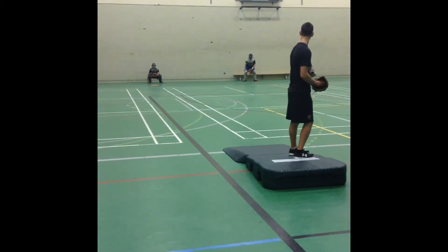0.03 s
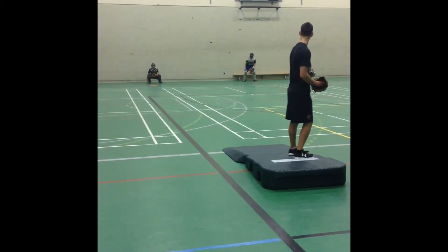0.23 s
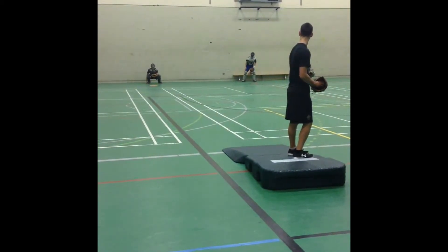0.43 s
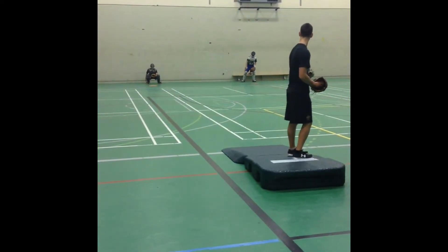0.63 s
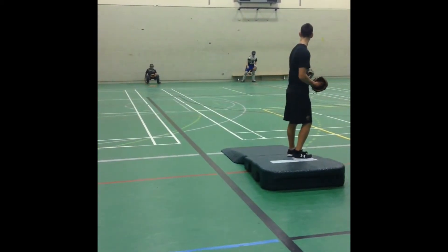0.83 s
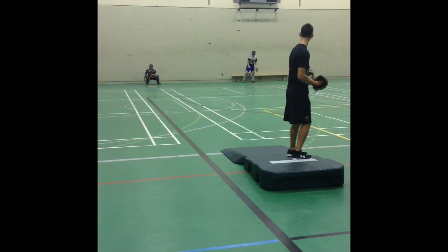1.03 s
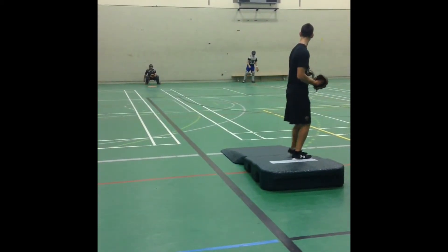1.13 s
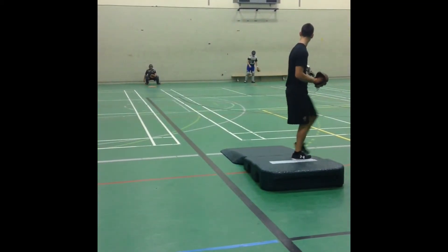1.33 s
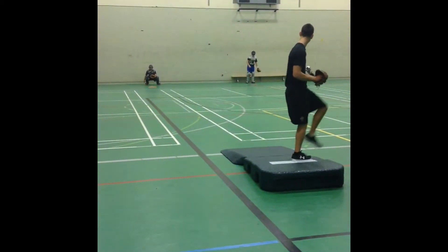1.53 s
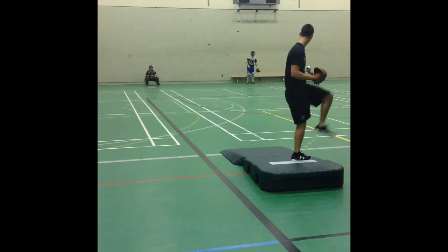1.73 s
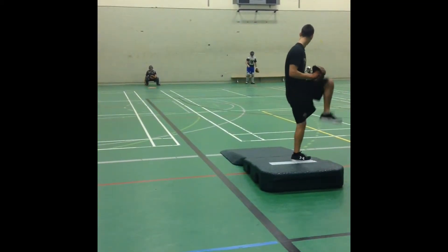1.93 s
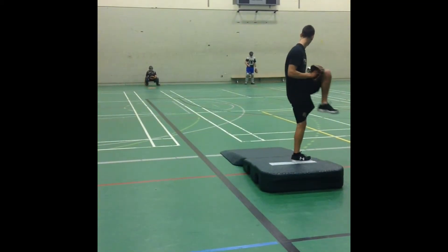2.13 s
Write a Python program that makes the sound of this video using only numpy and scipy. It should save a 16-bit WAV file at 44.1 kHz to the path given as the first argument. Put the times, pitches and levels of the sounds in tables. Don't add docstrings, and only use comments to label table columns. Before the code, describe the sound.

Sharp loud leather pop of a caught ball, then long reverberant ringing in a large hall.

```python
import sys
import numpy as np
from scipy import signal
from scipy.io import wavfile
from scipy.ndimage import uniform_filter1d

SR = 44100
rng = np.random.default_rng(int(sys.argv[2]) if len(sys.argv) > 2 else 0)


def natural_amplitude(level_db):
    exponent = np.asarray(level_db, float) / 20
    return 10 ** exponent


def int16_out(signal):
    q = np.round(np.clip(np.atleast_2d(signal).T, -1, 1) * 32767)
    wavfile.write(sys.argv[1], SR, q.astype(np.int16))


N = 97020

# (frequency [Hz], level [dB], t60 [s])
POCKET_MODES = [(205, -13, .05), (375, -4.5, 0.069), (559, -17.5, .04), (702, -15, 0.031),
                (790, -16, 0.012), (900, -17.5, 0.022), (1452, -13.5, .025), (1760, -17, 0.035),
                (2485, -24.5, .04), (3330, -20.5, 0.025), (3980, -24, 0.022)]
# (frequency [Hz], level [dB], t60 [s])
CLOSING_MODES = [(100.7, -6.5, 0.062), (338, -10.5, 0.028), (1169, -15.5, .08), (2880, -20, 0.065),
                 (3040, -20.5, .04), (4200, -27, 0.015)]
# (frequency [Hz], level [dB], t60 [s])
FLOOR_MODES = [(141.7, -23.5, .25), (88, -31, .3)]
# (frequency [Hz], density [dB per Hz])
CRACK_COLOUR = [(200, -15.5), (500, -8.5), (1000, 4.5), (2100, -15), (3100, -9.5), (5000, -14.5),
                (7600, -21)]
# (delay [s], level [dB])
WALL_ECHOES = [(.038, -16.5), (0.056, -30), (0.0681, -10.5), (.126, -16.5), (0.216, -30)]
# (frequency [Hz], density [dB per Hz])
TAIL_COLOUR = [(40, -29), (150, 2.5), (350, -0.5), (700, -6), (1100, -7.5), (2000, -12.5), (3500, -13.5),
               (7600, -22)]
# (frequency [Hz], width [Hz], gain [dB])
TAIL_PEAKS = [(356, 58, 6), (826, 120, 1), (1190, 83, 9.5), (2600, 400, 0.5)]
# (frequency [Hz], t60 [s])
TAIL_DECAY = [(150, 7), (400, 7.67), (1100, 6.2), (1900, 3.74), (2600, 2), (3300, 1.21), (5000, 0.81),
              (7500, 0.63)]
# (frequency [Hz], build-up [s])
TAIL_BUILD_UP = [(80, 0.081), (300, .03), (2000, 0.015), (7000, .02)]
# (frequency [Hz], width [Hz], level [dB])
BOOM_PEAKS = [(67, 14, -1.5), (88.4, 30, 1.5), (139.6, 30, -4.5)]
# (time [s], peak level [dB], low edge [Hz], high edge [Hz], t60 [s])
SHOE_TICKS = [(.0448, -45.5, 900, 1890, 0.017), (.0452, -61, 2000, 6500, 0.016),
              (.058, -64.5, 1800, 6000, .02), (.1115, -58, 1500, 2490, .015),
              (0.1108, -67, 2600, 6500, 0.0075), (0.156, -69, 3960, 7330, 0.0091),
              (1.204, -55.5, 2800, 4040, 0.022), (1.207, -69, 4520, 7400, .015),
              (1.217, -54.5, 2600, 3570, 0.029), (1.219, -62, 3700, 6500, 0.031),
              (1.72, -73.5, 4200, 5500, .1), (1.33, -74, 2800, 4200, .6), (1.7687, -40, 740, 1790, 0.026)]
# (middle [s], length [s])
CLOTH_SCUFFS = [(.95, .1), (1.24, 0.032), (1.385, 0.089)]
# (frequency [Hz], density [dB per Hz])
AIR_COLOUR = [(18, -35.5), (30, -11.5), (79, 7), (205, -9), (420, -7), (804, -18.5), (1140, -24.5),
              (2620, -35), (7600, -42.5), (9880, -77.5), (16700, -120)]

SLAP_S, SHUT_S, MUTE_S = 0.2045, 0.2175, 0.2275
FLUTTER_S = 0.2553


def read(points, hz):
    f, value = np.transpose(points)
    return np.interp(np.log(hz + 1), np.log(f + 1), value)


def evened(x):
    return x / np.sqrt(np.mean(x ** 2) + 1e-20)


def since(s):
    return np.maximum(np.arange(N) / SR - s, 0)


def later(x, s):
    k = round(s * SR)
    return np.r_[np.zeros(k), x[:N - k]]


def dull(x, order, hz):
    return signal.lfilter(*signal.butter(order, hz, fs=SR), x)


def band(x, lo_hz, hi_hz):
    sos = signal.butter(2, [lo_hz, hi_hz], "band", fs=SR, output="sos")
    return evened(signal.sosfilt(sos, x))


def noise(shape_db, size):
    hop = size // 4
    hz = np.fft.rfftfreq(size, 1 / SR)[:, None]
    t = np.arange(N // hop + 5)[None] * hop / SR
    a, b = rng.standard_normal((len(t[0]), len(hz), 2)).T
    spectra = (a + 1j * b) * natural_amplitude(shape_db(hz, t))
    return signal.istft(spectra, nperseg=size, noverlap=size - hop)[1][:N]


def coloured(points):
    return lambda hz, t: read(points, hz) - 60 * (hz > 8500) + 0 * t


def ring(modes, s, rise_s):
    t = since(s)
    tones = sum(natural_amplitude(db - 60 * t / t60) * np.sin(2 * np.pi * hz * t) for hz, db, t60 in modes)
    return (1 - np.exp(-t / rise_s)) * tones


def mitt(t60=9.0):
    grit = evened(noise(coloured(CRACK_COLOUR), size=256))
    slap = ring(POCKET_MODES, SLAP_S, rise_s=0.00048)
    closing = -ring(CLOSING_MODES, SHUT_S, rise_s=0.00052)
    out = np.zeros(N)
    for s, crack_db, modes in [(SLAP_S, -14.5, slap), (SHUT_S, -19, closing)]:
        t = since(s)
        crack = grit * natural_amplitude(crack_db - 60 * t / 0.067) * np.minimum(t / 0.003, 1)
        out = out + (modes + crack) * natural_amplitude(-60 * t / t60)
    mute_db, mute_fall_s = -12, 0.002
    return out * natural_amplitude(mute_db * np.minimum(since(MUTE_S) / mute_fall_s, 1))


def floor_thud():
    return ring(FLOOR_MODES, 0.2275, rise_s=0.0045)


def echoes():
    round_s, round_loss_db, smear_t60 = 0.263, -3.5, 0.08
    attacks = mitt(t60=0.05)
    thin = signal.lfilter(*signal.butter(1, 400, "high", fs=SR), attacks)
    out = dull(sum(natural_amplitude(db) * later(thin, s) for s, db in WALL_ECHOES), 1, 2600)
    panel = signal.lfilter(*signal.iirpeak(2530, 6, fs=SR), thin)
    back = natural_amplitude(-14.5) * (thin + 2 * panel)
    t = np.arange(2000) / SR
    for trip in range(4):
        back = signal.sosfilt(signal.butter(4, 2600, fs=SR, output="sos"), back)
        out = out + later(back, FLUTTER_S + trip * round_s)
        smear = rng.standard_normal(len(t)) * natural_amplitude(-60 * t / smear_t60)
        smear = smear / np.linalg.norm(smear)
        back = natural_amplitude(round_loss_db) * signal.oaconvolve(dull(back, 2, 1700), smear)[:N]
    return out


def hall():
    tail_db, wait_s, near_db, near_t60 = -33, 0.054, -20.5, 0.15
    earlier_s, earlier_db = -1.42, -3

    def colour(hz, t):
        peaks = sum(db / (1 + (2 * (hz - f) / w) ** 2) for f, w, db in TAIL_PEAKS)
        return coloured(TAIL_COLOUR)(hz, t) + peaks

    def shape(hz, t):
        u = np.maximum(t - SLAP_S - wait_s, 0)
        t60 = read(TAIL_DECAY, hz)
        older = natural_amplitude(2 * earlier_db + 2 * 60 * (earlier_s + u - t) / t60)
        older = older / (1 + (330 / (hz + 1)) ** 6)
        rise = 10 * np.log10(1 - np.exp(-u / read(TAIL_BUILD_UP, hz)) + older)
        surge = 0.5 * np.cos(2 * np.pi * (t - SLAP_S - 0.03) / FLUTTER_S)
        hard_band = (np.tanh((hz - 1800) / 400) - np.tanh((hz - 2800) / 100)) / 2
        hard_walls = -0.5 * hard_band * (1 - np.exp(-u / 0.48))
        lumps = uniform_filter1d(rng.standard_normal(rise.T.shape), 30, axis=0)
        lumps = 1.5 * evened(uniform_filter1d(lumps, 2, axis=1)).T
        return colour(hz, t) + hard_walls + lumps + rise + surge - 60 * u / t60

    steady = noise(colour, size=512)
    scale = 1 / np.sqrt(np.mean(steady ** 2))
    t = since(SLAP_S)
    near = natural_amplitude(near_db - 60 * t / near_t60) * (t > 0.002)
    return scale * (natural_amplitude(tail_db) * noise(shape, size=512) + near * steady)


def boom():
    def shape(hz, t):
        peaks = sum(natural_amplitude(db) / (1 + (2 * (hz - f) / w) ** 2) for f, w, db in BOOM_PEAKS)
        return 20 * np.log10(peaks) + 0 * t

    level_db, rise_s, t60 = -32, 0.16, 11.23
    u = since(SLAP_S + 0.089)
    return evened(noise(shape, size=4096)) * natural_amplitude(level_db - 60 * u / t60) * (1 - np.exp(-u / rise_s))


def slap_hiss():
    level_db, slope_db_per_s = -57.5, 700
    swell = natural_amplitude(level_db - slope_db_per_s * abs(since(0) - SLAP_S))
    return band(rng.standard_normal(N), 2500, 7000) * swell


def scuffs():
    swells = sum(np.exp(-((since(0) - s) / length) ** 2) for s, length in CLOTH_SCUFFS)
    return natural_amplitude(-76.5) * band(rng.standard_normal(N), 2500, 7000) * swells


def shoes():
    signs = np.sign(rng.standard_normal(N))
    out = np.zeros(N)
    for s, db, lo_hz, hi_hz, t60 in SHOE_TICKS:
        t = since(s)
        grain = np.sqrt(SR / 2 / (hi_hz - lo_hz))
        click = natural_amplitude(10.5) * grain * (t < 1.5 / SR)
        burst = natural_amplitude(db - 60 * t / t60) * (t > 0) * (signs * grain + click)
        sos = signal.butter(7, [lo_hz, hi_hz], "band", fs=SR, output="sos")
        out = out + signal.sosfilt(sos, burst)
    return out


def air():
    return natural_amplitude(-51.5) * evened(noise(coloured(AIR_COLOUR), size=2048))


def scene():
    catch = mitt() + floor_thud()
    room = echoes() + hall() + boom()
    return (catch + room + slap_hiss() + scuffs() + shoes() + air())[None]


def top_cut(x):
    return signal.sosfilt(signal.butter(12, 8550, fs=SR, output="sos"), x)


def record(dry):
    ceiling = 1.5
    edge = signal.firwin(511, 7650, window=("kaiser", 7), fs=SR)
    x = signal.filtfilt(*signal.butter(2, 41, "high", fs=SR), dry)
    x = signal.oaconvolve(x, edge[None], "same")
    mix = ceiling * np.tanh(x / ceiling)
    return top_cut(mix)


dry = scene()
out = record(dry)
int16_out(out)
```